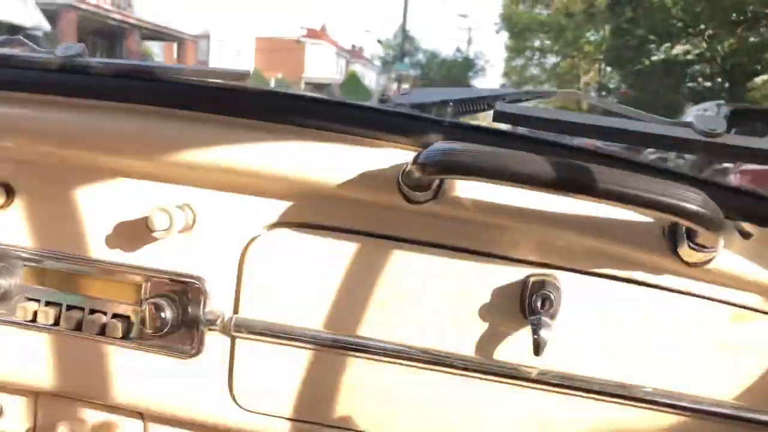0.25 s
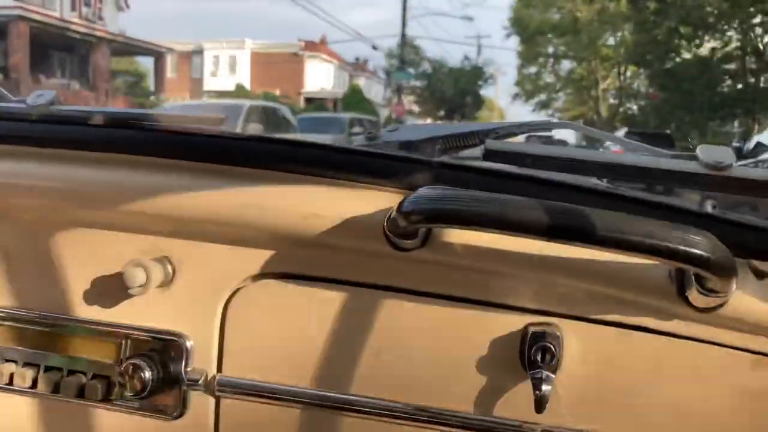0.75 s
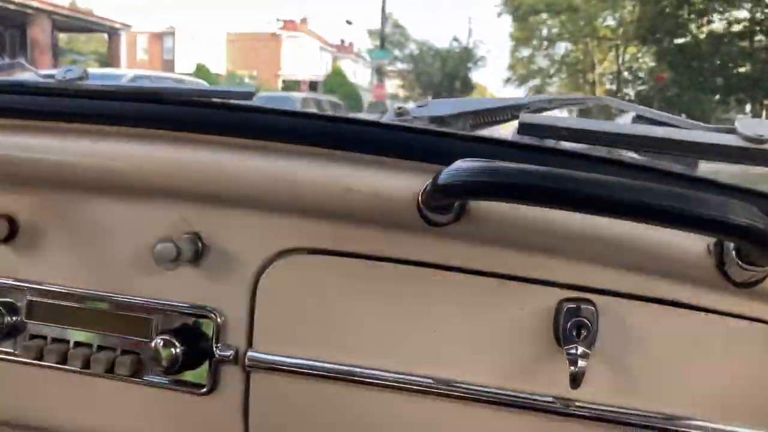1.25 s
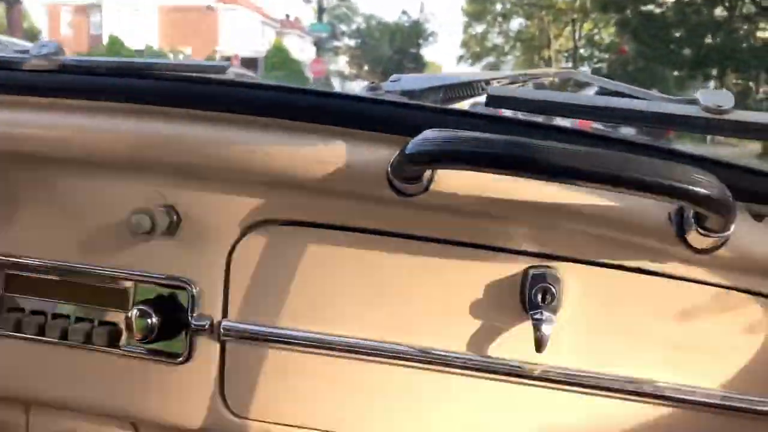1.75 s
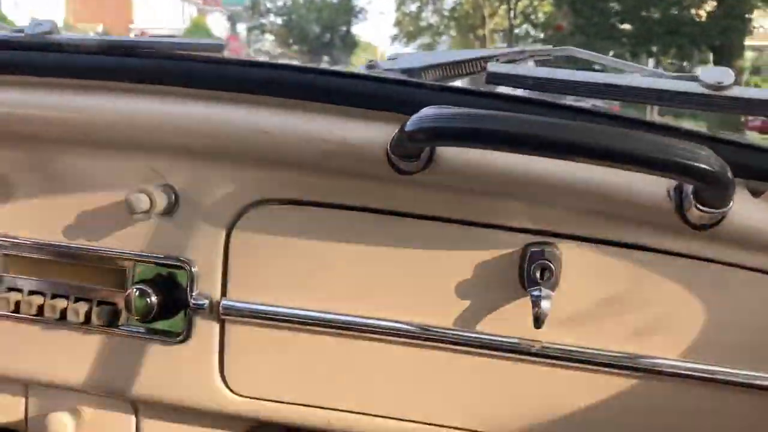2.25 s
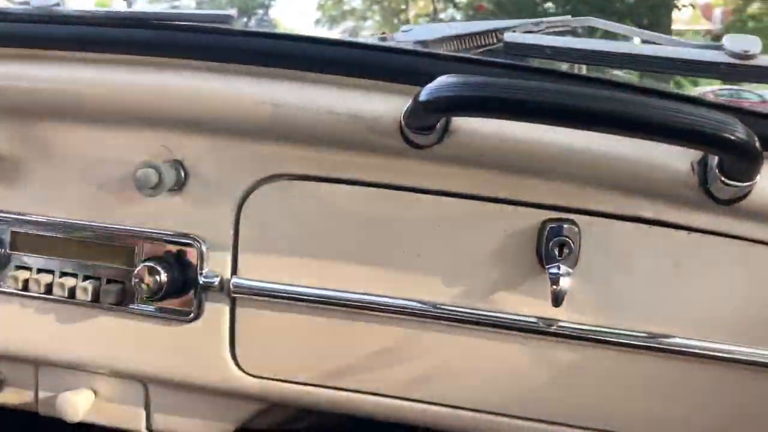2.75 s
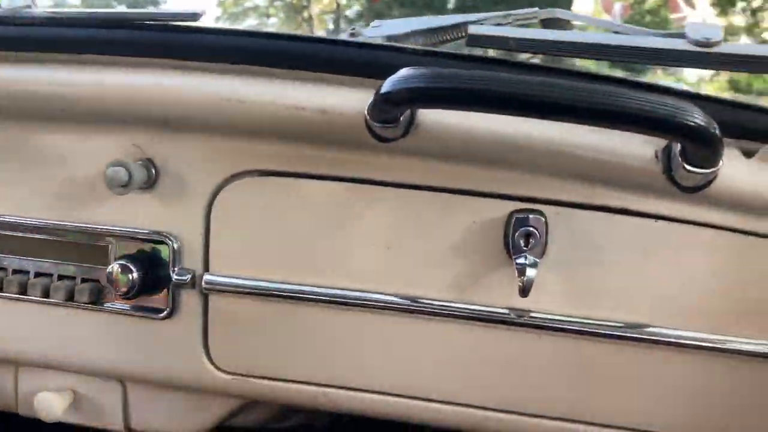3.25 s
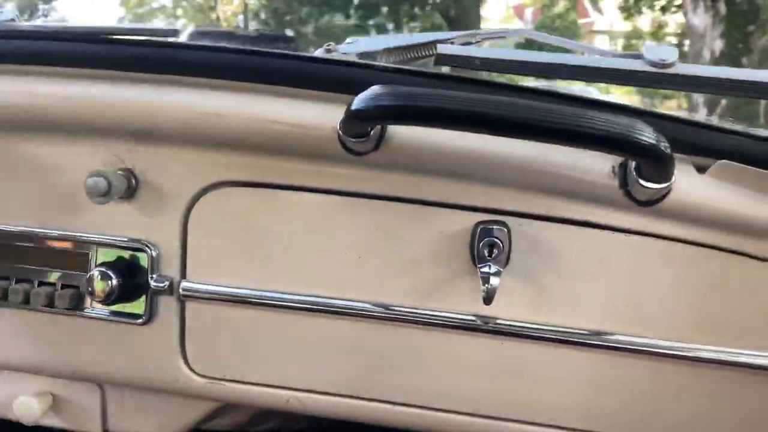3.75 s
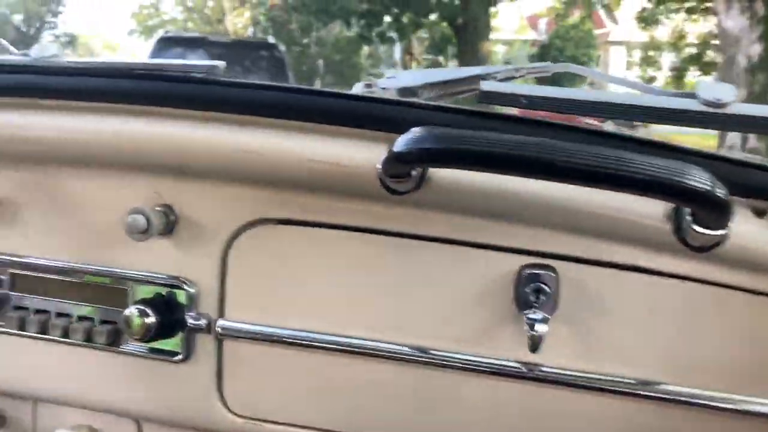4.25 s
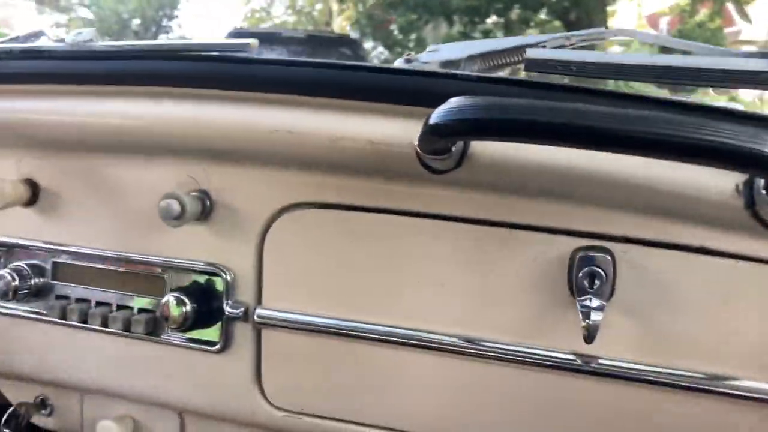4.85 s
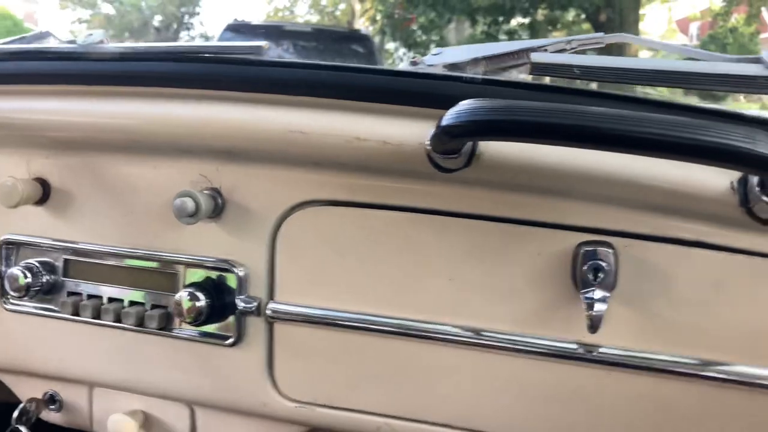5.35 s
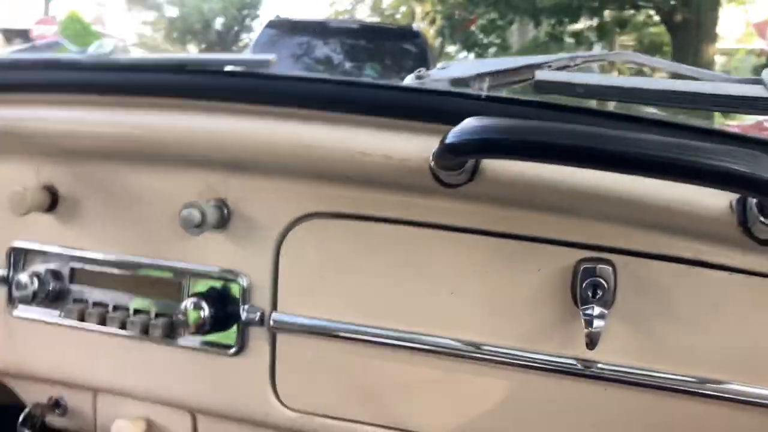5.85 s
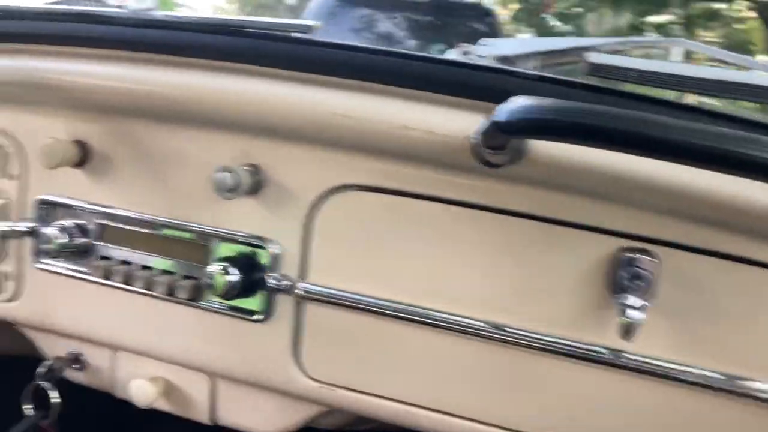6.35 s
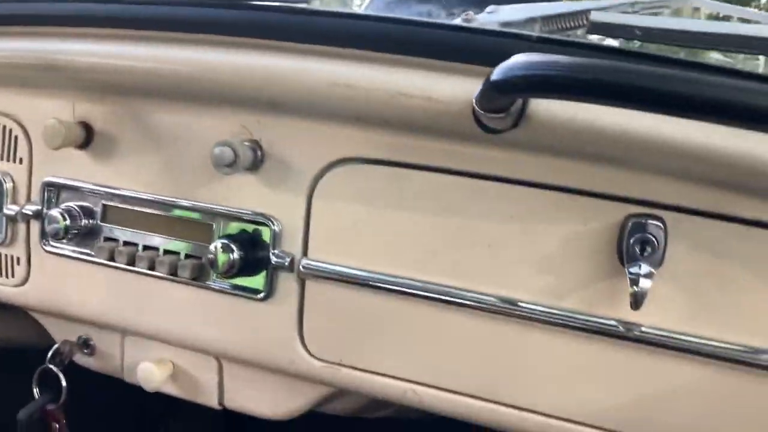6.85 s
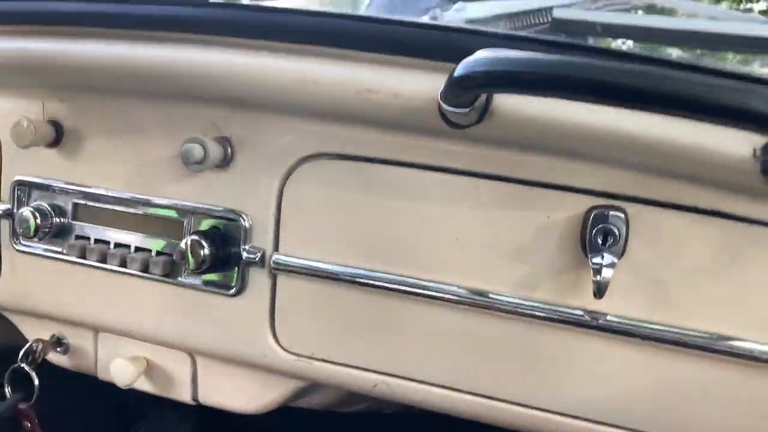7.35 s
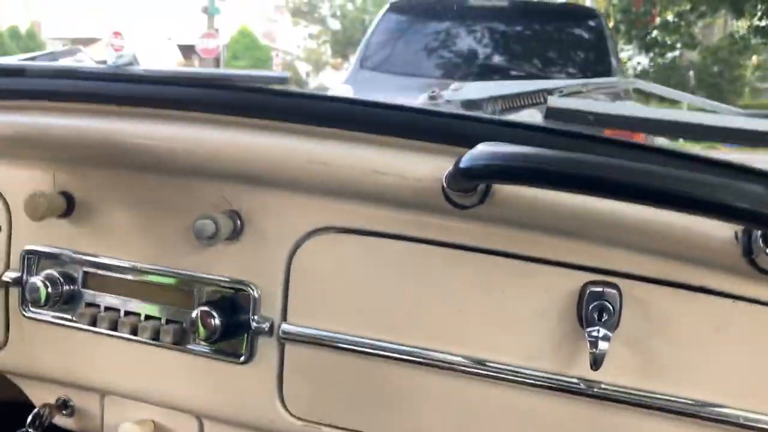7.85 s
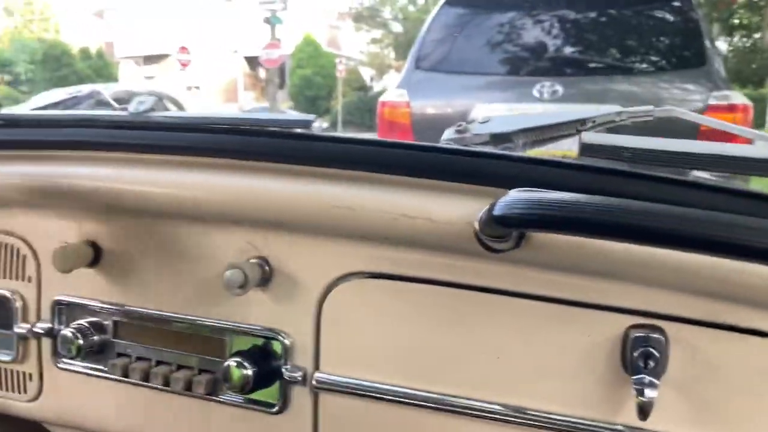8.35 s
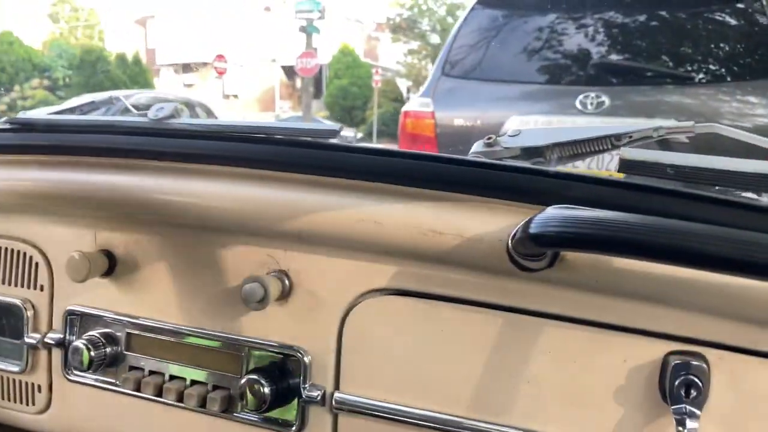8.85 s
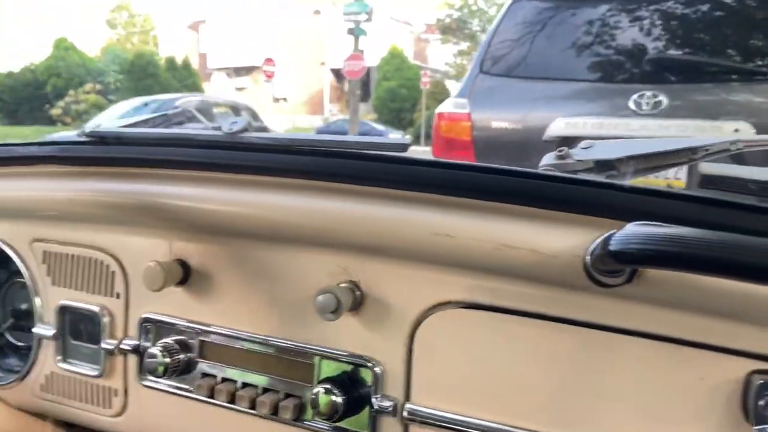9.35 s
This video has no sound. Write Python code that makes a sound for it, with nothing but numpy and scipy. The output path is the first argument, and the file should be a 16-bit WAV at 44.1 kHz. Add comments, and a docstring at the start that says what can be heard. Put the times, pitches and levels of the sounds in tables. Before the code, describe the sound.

Inside an old car, an air-cooled engine drones and clatters near idle over fading road rumble, opening with a rattling bump and sagging near the end.

```python
"""An old air-cooled four-cylinder engine near idle, heard inside the car as it rolls slowly up to a junction.
The exhaust booms in the cabin as a stack of sine orders of the crank speed; valve knocks ring the body
panels. The engine labours and quietens briefly near the end. Road rumble and tyre rush are coloured noise
that ebbs as the car slows and returns a little at the end. A bump lifts the noise at the start; struck modes
make the clunks of suspension and controls, short noise bursts the clicks of keys and trim."""
import sys
import numpy as np
from scipy import signal
from scipy.fft import rfft, irfft, next_fast_len
from scipy.io import wavfile
from scipy.ndimage import uniform_filter1d, map_coordinates

SR = 44100
rng = np.random.default_rng(int(sys.argv[2]) if len(sys.argv) > 2 else 0)


def log_audio(samples):
    """Write samples as a 16-bit WAV file to the path given in sys.argv[1]."""
    # one column per channel
    frames = np.atleast_2d(samples).T
    # limit to full scale, then quantise
    limited = np.clip(frames, -1, 1)
    pcm = np.round(limited * 32767).astype(np.int16)
    wavfile.write(sys.argv[1], SR, pcm)


N = 422919
TIME = np.arange(N) / SR  # seconds

REFERENCE_SPEED = 21.2  # crankshaft turns a second at which boom and clatter have their unsagged level

# Pitches in Hz at which the strength of each valve's knock is listed, low to high.
VALVE_HZ = (790, 917, 1070)
# What the keys ring with. Each row: centre in Hz, width in Hz, relative level in dB.
KEY_MODES = [(7300, 2200, 5), (8950, 320, 10), (10600, 1800, 2.5), (14800, 2200, -22)]


def amp(db):
    """Decibels to gain."""
    return 10 ** (np.asarray(db) / 20)


def unit(x):
    """Scale to rms 1."""
    return x / np.sqrt(np.mean(x ** 2) + 1e-20)


def curve(rows):
    """One value per sample, joined by straight lines between (s, value) rows."""
    s, value = np.transpose(rows)
    return np.interp(TIME, s, value)


def wobble(rate):
    """A smooth random curve through random knots, rate knots a second."""
    coarse = TIME[::64]
    knots = rng.standard_normal(int(N * rate / SR) + 4)
    # cubic spline through the knots, read every 64 samples
    return np.interp(TIME, coarse, map_coordinates(knots, [coarse * rate]))


def swells(rows):
    """Sum of smooth bells, one for each (s at the middle, dB, half length s) row."""
    return sum(amp(db) / (1 + ((TIME - s) / length) ** 2) ** 2 for s, db, length in rows)


def burst(s, swell, t60):
    """Envelope with peak 1 that swells from time s and dies away by 60 dB in about t60 seconds."""
    t = np.arange(SR // 2) / SR
    shape = (1 - np.exp(-(t / swell) ** 2)) * amp(-60 * t / t60)
    return np.pad(shape / shape.max(), (round(s * SR), N))[:N]


def along(points, hz):
    """(Hz, dB) points read on a log frequency axis, -120 dB beyond their ends."""
    f, db = np.transpose(points)
    return np.interp(np.log(hz + 1), np.log(f), db, -120, -120)


def filtered(x, response):
    """x through a complex response of frequency, padded so that tails do not wrap round."""
    size = next_fast_len(N + SR // 4)
    return irfft(rfft(x, size) * response(np.fft.rfftfreq(size, 1 / SR)), size)[..., :N]


def noise(points):
    """Noise of rms 1 with a spectrum of (Hz, dB) points."""
    return unit(filtered(rng.standard_normal(N), lambda hz: amp(along(points, hz))))


def resonance(f, centre, width):
    """Causal response of one damped mode."""
    return 1j * f * width / (centre ** 2 - f ** 2 + 1j * f * width)


def ring(x, modes):
    """x through a set of modes, scaled so that white noise keeps its power."""
    def response(f):
        total = 0
        for k, (hz, width, db) in enumerate(modes):
            # neighbouring modes move in opposite sign
            total = total + (-1) ** k * amp(db) * resonance(f, hz, width)
        return total / np.sqrt(np.mean(abs(total) ** 2))
    return filtered(x, response)


def struck(s, modes, tilt):
    """Modes rung at time s with energy 1; a harder blow tilts them upward, in dB per octave."""
    t = np.arange(SR // 4) / SR
    rung = np.zeros(len(t))
    for hz, width, db in modes:
        decay = width * np.exp(-np.pi * width * t)
        rung += amp(db + tilt * np.log2(hz)) * decay * np.sin(2 * np.pi * hz * t)
    return np.pad(rung / np.linalg.norm(rung), (round(s * SR), N))[:N]


def panel(x, hz, width):
    """x through one steep resonance that swells and fades softly, its slow level held at 1."""
    b, a = signal.iirpeak(hz, hz / (2.5 * width), SR)  # three passes narrow the widened peak again
    rung = signal.filtfilt(b, a, signal.lfilter(b, a, x), padtype=None)
    slow_power = np.abs(uniform_filter1d(rung ** 2, size=SR // 2))
    return rung / np.sqrt(slow_power + 1e-12)


def patchy(x, depth_db, size=(9, 8)):
    """The colour of x shifts at random, in patches about 400 Hz wide and a tenth of a second long."""
    z = signal.stft(x, nperseg=1024)[2]
    field = uniform_filter1d(rng.standard_normal(z.shape), size[0], axis=0)
    field = uniform_filter1d(field, size[1], axis=1)
    return unit(signal.istft(z * amp(depth_db * unit(field)))[1][:N])


def reflected(x, echo_db=-11, t60=.06):
    """Glass and bare metal add close echoes, which ripple the spectrum."""
    t = np.arange(SR // 20) / SR
    echoes = rng.standard_normal(len(t)) * amp(-60 * t / t60)
    echoes = echoes / np.linalg.norm(echoes)
    return unit(x + amp(echo_db) * signal.oaconvolve(x, echoes)[:N])


def stereo(mid, side, left_db):
    """Left and right from a common and an opposed part, the left louder than the right by left_db."""
    return np.array([mid + side, mid - side]) * amp([[left_db / 2], [-left_db / 2]])


def ports(x):
    """Treble reaches the two microphone ports a moment apart and in opposite sign."""
    lag = .000305  # seconds
    sign = np.array([[1], [-1]])
    return sign * filtered(x, lambda f: np.exp(1j * np.pi * f * lag * sign))


def placed(x, hz, left_db, lead):
    """A narrow sound at hz as the two ports hear it, the left one lead radians ahead."""
    quarter_ahead = np.gradient(x) * SR / (2 * np.pi * hz)
    return stereo(np.cos(lead / 2) * x, np.sin(lead / 2) * quarter_ahead, left_db)


def exhaust(speed, turns, uneven_db=-20, spread=.07, strong_at=0.84, count=128):
    """Two firings a turn boom in the cabin, weaker and loping at low speed; unequal cylinders add half orders."""
    # Exhaust note at the tailpipe. Each row: multiple of the crank speed, relative level in dB.
    orders = [(2, -5), (3, -27.5), (4, 0), (5, -15.5), (6, -2), (7, -7.5), (8, -3.5), (9, -10.5),
              (10, -6.5), (11, -11), (12, -7.5), (13, -9.5), (14, -15)]
    # How the cabin air booms. Each row: frequency in Hz, gain in dB.
    cabin_air = [(26, -20), (32, -11), (38, -0.5), (48, 4), (62, -3.5), (80, 2), (92, -1.5), (106, -7),
                 (125, -7), (152, -2.5), (182, -8.5), (200, -20), (250, -25.5), (320, -27)]
    boom_db, boom_sag_db = -16.5, 0.53  # level at the reference speed; dB lost per turn a second below it
    # dB of once-a-turn swing per turn a second below the smooth speed (turns a second)
    lope_depth_db, smooth_speed = .85, 19.3
    halves = [(k + .5, uneven_db) for k in range(4, 10)]
    note = np.zeros(N)
    for k, db in orders + halves:
        level = amp(db + along(cabin_air, k * speed[::count]))
        # higher orders arrive later, which spreads each firing into an even drone
        wave = np.sin(2 * np.pi * (k * turns - spread * k ** 2))
        note += np.interp(TIME, TIME[::count], level) * wave
    labour = np.maximum(smooth_speed - speed, 0)
    lope_db = lope_depth_db * labour * np.cos(2 * np.pi * (turns - strong_at))
    level_db = boom_db - boom_sag_db * (REFERENCE_SPEED - speed) + lope_db
    return stereo(amp(level_db) * unit(note), 0, left_db=2.0)


def valve_knocks(turns, hz, scatter_db=2.3, jitter=.00005):
    """Each valve knocks once in two turns; a panel at hz hears some far more than others, so it limps."""
    # The eight valves. Each row: place in the two-turn cycle in turns, then knock strength in dB
    # at each of the three VALVE_HZ.
    valves = [(0.029, -3.5, -1, -1), (.2, -2.5, -3.5, -5.5), (0.549, -0.5, -6.5, -2.5),
              (.76, -1.5, -6.5, 1), (.98, -0.5, -3, -0.5), (1.18, -2.5, 3, -3.5), (1.56, -6, -4.5, 4),
              (1.78, -4, -2.5, -1.5)]
    cycles = np.arange(0, turns[-1] - 2, 2)
    knocks = np.zeros(N)
    for place, *strengths_db in valves:
        late, size = rng.standard_normal((2, len(cycles)))
        at = np.interp(cycles + place, turns, TIME) + jitter * late
        size_db = np.interp(hz, VALVE_HZ, strengths_db) + scatter_db * size
        samples = np.round(np.abs(at) * SR).astype(int)
        knocks += np.bincount(samples, amp(size_db), N)[:N]
    return knocks


def clatter(speed, turns, drift_db=0.77, shake_db=0.4, waver_s=.0003, bump_db=10):
    """The knocks ring each panel with wavering strength and pitch, over a dull wash of gears and floor."""
    # Body panels rung by the valve gear. Each row: centre in Hz, nominal width in Hz, relative level in dB,
    # left over right in dB, lead of the left in radians.
    panels = [(216.5, 28, -7.5, -4, 0.18), (261, 37, -12.5, -5.5, -0.53), (414, 64, -14, 4, .5),
              (507.5, 26, -9.5, 7.5, 1.54), (673, 24, -5, 2, 1.48), (781.4, 20, -6.5, -5, -2.15),
              (917, 27, -1.5, -1.5, 1.27), (1012, 21, -9.5, 8, 0.93), (1059, 38.6, -3, 3.5, 0.86),
              (1329, 32, -17, -2, 1), (1507, 92, -18, 6, 1.7)]
    # Valve clatter at the reference speed. Each row: time in seconds, level in dB.
    clatter_rows = [(0, -36), (3, -33.5), (7, -34.5), (9.59, -36.5)]
    # Dull mechanical wash before the bump. Each row: time in seconds, level in dB.
    wash_rows = [(0, -40.5), (2.3, -38.5), (3.4, -42.5), (5, -42), (8.4, -39.5), (9.1, -36.5)]
    # Colour of the wash. Each row: frequency in Hz, relative dB per Hz.
    wash_colour = [(100, -22), (200, -5), (265, 3), (330, 1.5), (500, 0.5), (600, -2), (900, -1),
                   (1120, -2.5), (1300, -14), (2000, -26.5)]
    knock_db = curve(clatter_rows) + shake_db * wobble(16)
    sag_db = 1.4 * (REFERENCE_SPEED - speed)  # dB per turn a second lost, at the highest VALVE_HZ
    rung = np.zeros((2, N))
    for hz, width, db, left_db, lead in panels:
        steady = panel(valve_knocks(turns, hz), hz, width)
        x = np.interp(TIME + waver_s * wobble(4), TIME, steady)
        # softer knocks lose their high panels first
        level_db = db + knock_db - sag_db * hz / VALVE_HZ[-1] + drift_db * wobble(5)
        rung += amp(level_db) * placed(x, hz, left_db, lead)
    wash = stereo(noise(wash_colour), amp(-1.0) * noise(wash_colour), left_db=-1.5)
    return rung + amp(curve(wash_rows) + bump_db * bump()) * wash


def bump():
    """How hard the opening bump shakes the car, 0 to 1."""
    corners = np.cumsum([0, 0.06, 0.09, 0.17])  # start, then attack, hold and release in seconds
    return np.interp(TIME, corners, [0, 1, 1, 0])


def road(lumps_db=1.84, lumpy_at_db=-18, bump_db=4.5):
    """Uneven asphalt drums on the floor, less lumpily when the rumble is low, with a throb at each seam."""
    # Road rumble before bump and lumps. Each row: time in seconds, level in dB.
    rumble_rows = [(0, -16), (2.4, -19), (3.1, -20), (3.6, -23.5), (4.8, -25), (5.6, -27.5), (7.6, -30),
                   (8.5, -28.5), (9.59, -23)]
    # Asphalt seams throb in the floor. Each row: middle in seconds, level in dB, half length in seconds.
    seams = [(1.14, -28, 0.034), (2.16, -26, 0.026), (2.8, -28, 0.087), (3.9, -24, 0.078),
             (4.12, -24, 0.034), (4.73, -23, .035)]
    # How the road shakes the cabin. Each row: frequency in Hz, relative dB per Hz.
    rumble_colour = [(15, -30), (24, -23), (34, 1), (48, 0.5), (62, -2), (80, 1), (92, 0), (106, -2.5),
                     (125, -9.5), (152, -8.5), (182, -10.5), (250, -19.5), (320, -29), (1000, -35.5)]
    road_db = curve(rumble_rows)
    lumpiness_db = lumps_db * amp(road_db - lumpy_at_db) * wobble(18)
    level = amp(road_db + bump_db * bump() + lumpiness_db) + swells(seams)
    return level * stereo(noise(rumble_colour), amp(-15.5) * noise(rumble_colour), left_db=2.5)


def rush(turns, firing_db=0.93, cycle_db=0.5, level_db=1, bump_db=2, bump_hiss_db=7.5):
    """Tyres and the cooling fan rush, brighter when louder; the sound pulses a little with each firing."""
    # Tyre and fan rush before level_db is added. Each row: time in seconds, level in dB.
    rush_rows = [(0, -41.5), (.5, -43.5), (.9, -42.5), (1.65, -43), (2.3, -41.5), (2.56, -43), (5.13, -45),
                 (5.85, -44), (6.15, -45), (8.4, -46), (9.59, -42)]
    # Colour of the part common to both ports. Each row: frequency in Hz, relative dB per Hz.
    mid_colour = [(710, -49), (1200, 0.5), (1390, -3.5), (1520, -2.5), (1750, -3.5), (2170, -3),
                  (2630, -7.5), (3090, -6.5), (3670, -10), (4080, -8), (4500, -13), (5680, -19.5),
                  (6500, -18), (8450, -21), (14300, -120)]
    # Colour of the opposed part. Each row: frequency in Hz, relative dB per Hz.
    side_colour = [(710, -33), (1200, -4), (1430, 2), (1570, -2.5), (2020, -4.5), (2240, -3), (2610, -12),
                   (2820, -10), (2970, -9.5), (3800, -9), (4600, -18), (6500, -18.5), (8450, -50),
                   (14300, -120)]
    # Colour of the fine hiss. Each row: frequency in Hz, relative dB per Hz.
    hiss_colour = [(3500, -10.5), (5500, -4), (7000, 1.5), (8400, 0.5), (11500, -4), (14800, -6),
                   (16000, -16)]
    rush_db = curve(rush_rows)
    pulse_db = firing_db * np.cos(2 * np.pi * 2 * turns) + cycle_db * np.cos(np.pi * turns)
    mid, side = (patchy(reflected(noise(colour)), depth_db=1.45) for colour in (mid_colour, side_colour))
    body = stereo(mid, amp(0.9) * side, left_db=0.85)
    body = body * amp(rush_db + level_db + bump_db * bump() + pulse_db + 0.53 * wobble(25))
    diffuse = amp(-11) * np.array([noise(hiss_colour), noise(hiss_colour)])
    fine = ports(reflected(noise(hiss_colour))) + diffuse
    # -52.5 dB where the rush curve is at -44 dB, and 2.45 dB more for each dB of rush
    hiss_db = -52.5 + 2.45 * (rush_db + 44) + bump_hiss_db * bump()
    return body + fine * amp(hiss_db + 0.56 * pulse_db + 1.6 * wobble(60))


def sizzle(grain_db=3.0, grain_rate=350, flutter_db=1.5):
    """Coarse stretches of asphalt make the treads sizzle with a gritty, shifting sound."""
    # Sizzle on coarse asphalt before grain and flutter. Each row: time in seconds, level in dB.
    coarse_rows = [(0, -47), (.45, -64), (.8, -46), (1.4, -48), (1.7, -52.5), (2.25, -44), (2.6, -52),
                   (3.5, -53), (5, -64), (8.6, -64), (9.4, -52)]
    # Colour of the sizzle. Each row: frequency in Hz, relative dB per Hz.
    sizzle_colour = [(1300, -25), (2300, -7.5), (3100, -1.5), (4100, -3), (4800, -1), (5500, -12),
                     (8000, -15)]
    level_db = curve(coarse_rows) + grain_db * wobble(grain_rate) + flutter_db * wobble(14)
    mid, side = (patchy(noise(sizzle_colour), depth_db=2.0) for _ in range(2))
    return amp(level_db) * stereo(mid, amp(-1.5) * side, left_db=.7)


def clunks(soft_hz=1500, rubber_hz=1100, scuff_rise_s=0.0023, scuff_t60=0.06):
    """Each contact rings the floor pan in its own way, thuds in the chassis and scuffs briefly."""
    # Contacts of suspension and controls, in quick clusters. Each row: time in seconds, then drive in dB of
    # floor pan, chassis and scuff, hardness of the blow on the floor pan in dB per octave.
    contacts = [(.047, -7, 5, -39, 8), (0.062, 2, 2.5, -39, -4), (0.069, -8, 3.5, -43, 20),
                (0.099, -2.5, -10, -41, 18), (.117, -1, -3, -37, 17), (0.133, -3, 3, -38, 10),
                (.174, -15, 8, -40, 0), (.189, -13, 8.5, -34, 0), (.213, -9, 4, -42, 2),
                (.365, -12, 6, -48, 3), (.374, 4, -8, -37, 38), (0.383, -11, 11, -46, 0),
                (6.32, 2, -12, -44, 5), (6.335, 0, -18, -33, 0), (6.345, 2, -8, -39, 12),
                (6.356, 0, -2, -44, 0), (6.463, -3, -12, -34, 22), (6.695, 5, -20, -31, -6),
                (6.716, -4, -6, -42, 5), (6.729, 1.5, -10, -44, 0)]
    # Floor pan modes. Each row: centre in Hz, width in Hz, level in dB before the tilt of the blow.
    floor_pan = [(240, 105, -7), (412, 23, 9.5), (474, 100, -4), (576, 37, -16.5)]
    # Chassis modes. Each row: centre in Hz, width in Hz, relative level in dB.
    chassis_modes = [(247, 43, 8.5), (348, 94, -2), (546, 100, -22)]
    # Colour of the scuffs. Each row: frequency in Hz, relative dB per Hz.
    scuff_colour = [(200, 0), (550, 8), (900, -13), (1700, -12), (2800, -35)]
    pan, chassis, scuffs = np.zeros((3, N))
    for s, pan_db, chassis_db, scuff_db, tilt in contacts:
        pan += amp(pan_db) * struck(s, floor_pan, tilt)
        chassis[round(s * SR)] += amp(chassis_db)
        scuffs += amp(scuff_db) * burst(s, scuff_rise_s, scuff_t60)
    body = filtered(pan, lambda f: 1 / (1 + 1j * f / soft_hz) ** 2)
    thud = filtered(ring(chassis, chassis_modes), lambda f: 1 / (1 + 1j * f / rubber_hz) ** 3)
    mid = body + thud + scuffs * noise(scuff_colour)
    return stereo(mid, scuffs * noise(scuff_colour), left_db=-2.0)


def jumps(hz=960, rise_s=0.0043, t60=0.059):
    """A loose panel rings briefly, as a short sine, when the road jolts it."""
    # Jolts of the loose panel. Each row: start in seconds, peak in dB.
    jolts = [(.038, -29), (.141, -31), (.526, -21.5)]
    envelope = sum(amp(db) * burst(s, rise_s, t60) for s, db in jolts)
    return envelope * np.sin(2 * np.pi * hz * TIME)


def ticks(keys_db=-7, trim_db=-8):
    """Keys click together and loose trim buzzes: short bursts of noise through their modes."""
    # Clicks. Each row: start in seconds, level in dB before keys_db or trim_db, trim over keys in dB before them.
    clicks = [(.023, -42, 14), (0.035, -26, -6), (.046, -39, 9), (0.0653, -31, -7), (0.0907, -29, -7),
              (0.1145, -20.5, -3), (.124, -33, 6), (0.137, -32.5, 14.5), (0.1725, -24, -4),
              (.178, -31, -11), (.209, -36, 8), (0.2304, -25.5, -9), (0.262, -29, -2), (0.325, -31.5, -4),
              (0.3567, -32, -12), (1.501, -39, -8), (1.6741, -25.5, -13), (2.942, -25.5, -11),
              (4.4468, -30, -14), (5.668, -28.5, -9), (6.6896, -38.5, 11), (8.73, -36, -7)]
    # What the trim rings with. Each row: centre in Hz, width in Hz, relative level in dB.
    trim_modes = [(2400, 640, -2.5), (3030, 660, 2), (3960, 710, -1), (4800, 340, 3.5)]
    bright = sum(amp(db + keys_db) * burst(s, 0.00034, 0.032) for s, db, low_db in clicks)
    low = sum(amp(db + low_db + trim_db) * burst(s, 0.00094, 0.063) for s, db, low_db in clicks)
    keys = ports(ring(bright * rng.standard_normal(N), KEY_MODES))
    return keys + ring(low * rng.standard_normal((2, N)), trim_modes)


def key_sways(grain_db=2.5):
    """The hanging keys sway and brush one another in short, grainy shimmers of noise."""
    # Brushes of the keys. Each row: middle in seconds, level in dB, half length in seconds.
    sways = [(.125, -47, .06), (1.76, -45, .04), (3.83, -50, 0.077), (4.39, -50.5, 0.12),
             (5.14, -50.5, 0.17), (6.0, -50, 0.081), (7.24, -50, .04), (7.91, -53, 0.069),
             (8.3, -53.5, 0.12), (8.75, -51, .04)]
    brushing = swells(sways) * amp(grain_db * wobble(120)) * rng.standard_normal(N)
    return ports(ring(brushing, KEY_MODES))


def whistle():
    """Thin whistles and whines: narrow bands of noise swell and fade, alike at both ports."""
    # Each row: middle in seconds, level in dB, half length in seconds, centre in Hz, nominal width in Hz.
    whines = [(4.0, -59, .25, 4090, 70), (5.2, -44, 0.67, 710, 31), (5.876, -50.5, 0.3, 4050, 48),
              (6.7, -45.5, .9, 838, 6)]
    total = np.zeros(N)
    for s, db, length, hz, width in whines:
        total += swells([(s, db, length)]) * panel(rng.standard_normal(N), hz, width)
    return total


def scene():
    """The crankshaft drives boom and clatter and pulses the rush; road and loose parts add the rest."""
    # A steady idle, then dragged down and recovering. Each row: time in seconds, crankshaft turns a second.
    crank_rows = [(0, 19.3), (3.55, 19.3), (3.85, 19.1), (4.45, 19.05), (4.85, 19.35), (5.25, 19.05),
                  (5.8, 19.35), (6.4, 19.25), (7.1, 19.5), (7.35, 18.5), (7.7, 16.3), (8.24, 15.1),
                  (8.47, 15.15), (8.77, 17.4), (9.16, 19.2), (9.59, 19.1)]
    # the idle hunts at random by about 0.03 turns a second, 3 knots a second
    speed = curve(crank_rows) + 0.03 * wobble(3)
    turns = np.cumsum(speed) / SR
    engine = exhaust(speed, turns) + clatter(speed, turns)
    rolling = road() + rush(turns) + sizzle()
    contacts = clunks() + jumps() + ticks() + key_sways()
    return engine + rolling + contacts + whistle()


def record(dry):
    """The phone rounds off the loudest swings and keeps nothing above its band limit."""
    rounded = dry / (1 + np.abs(dry / .95) ** 8) ** (1 / 8)
    return filtered(rounded, lambda hz: hz < 15800)


dry = scene()
out = record(dry)
log_audio(out)
```